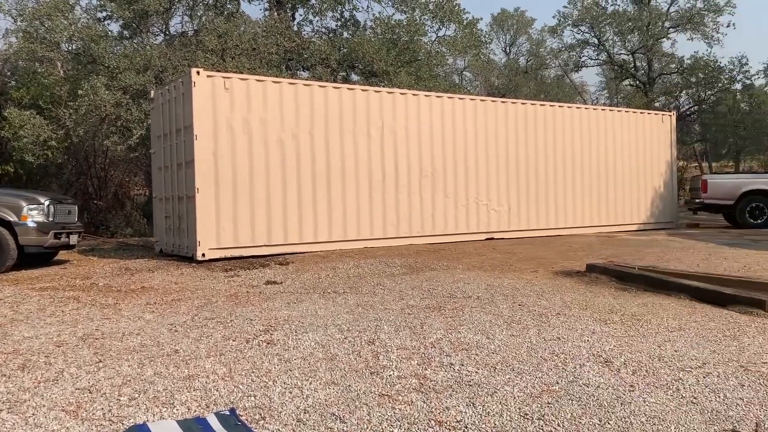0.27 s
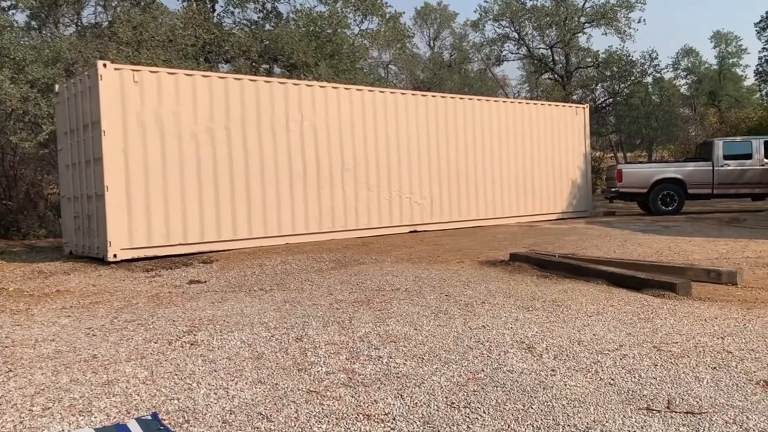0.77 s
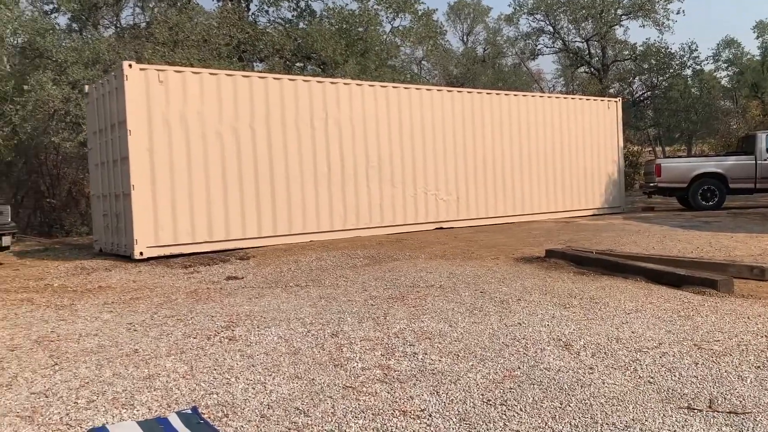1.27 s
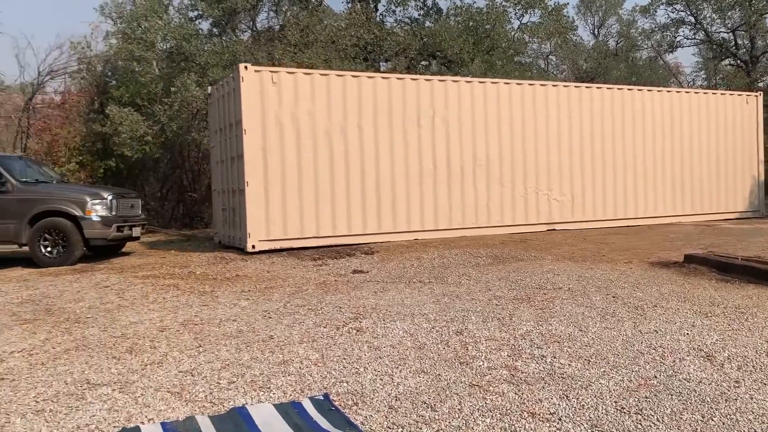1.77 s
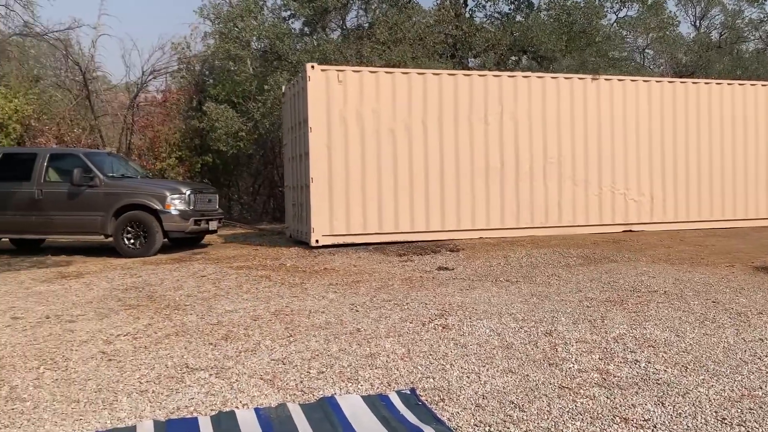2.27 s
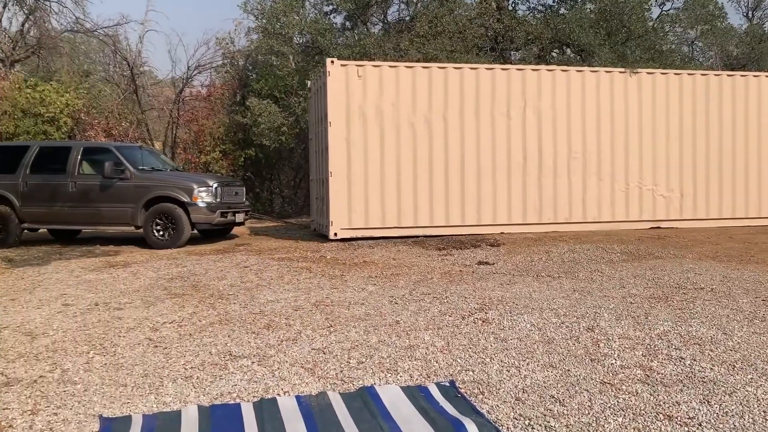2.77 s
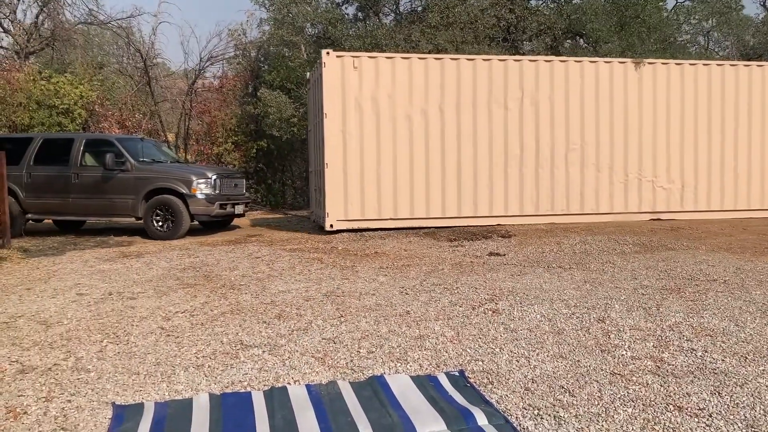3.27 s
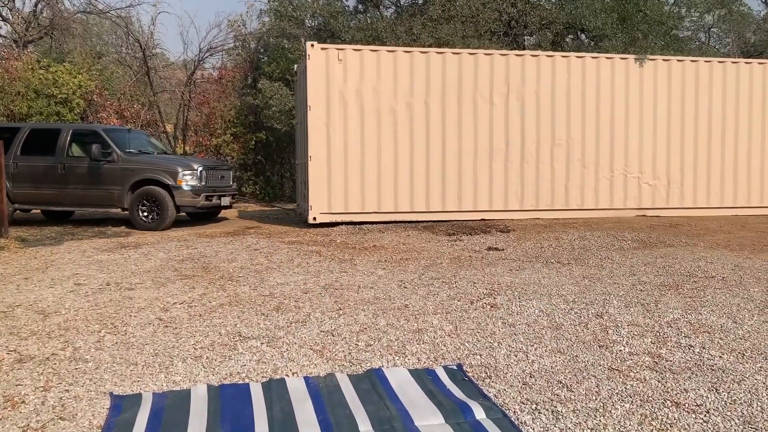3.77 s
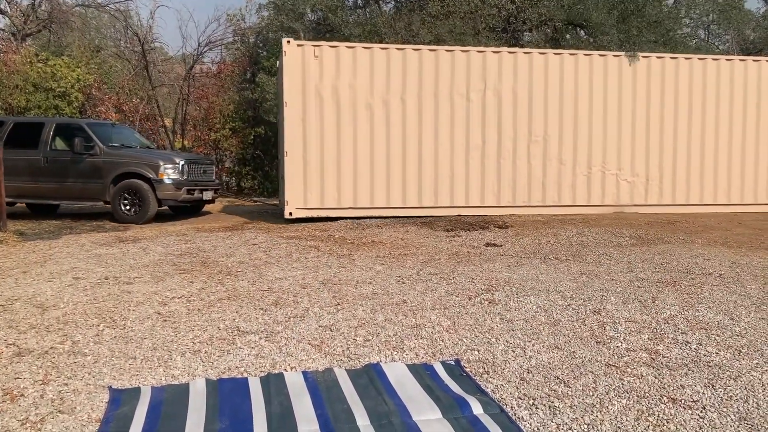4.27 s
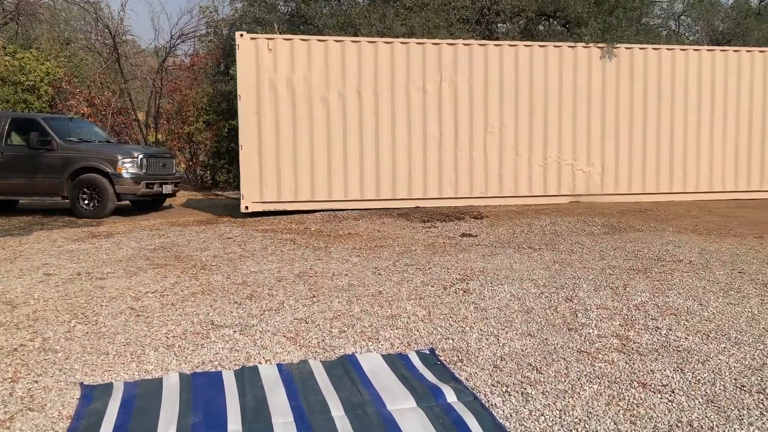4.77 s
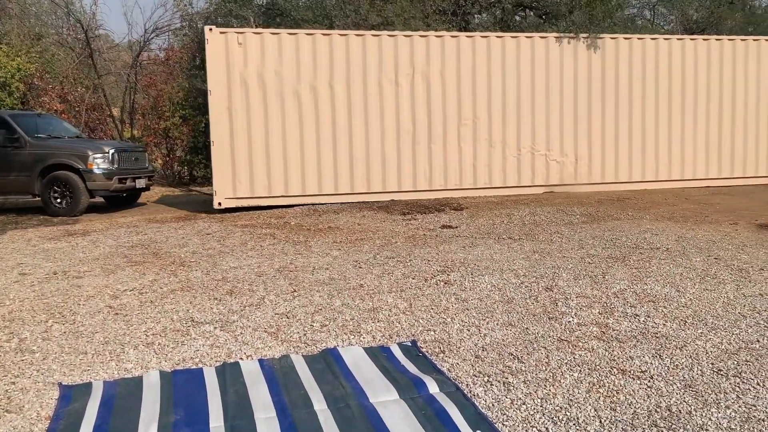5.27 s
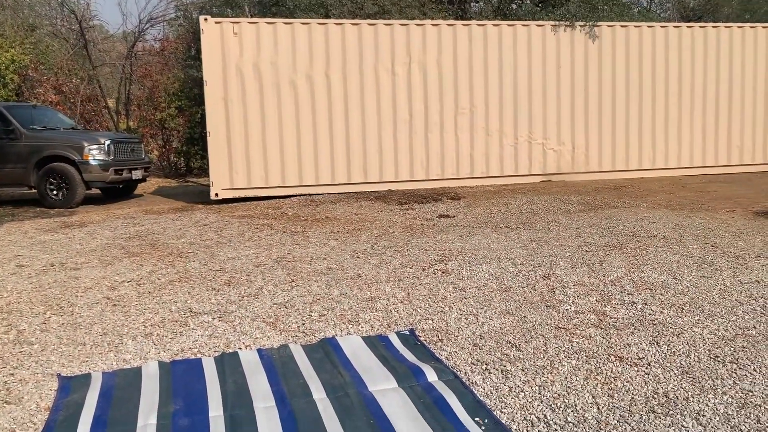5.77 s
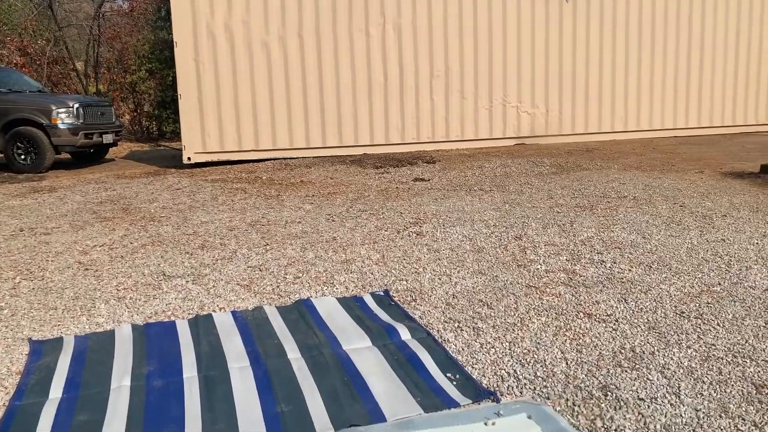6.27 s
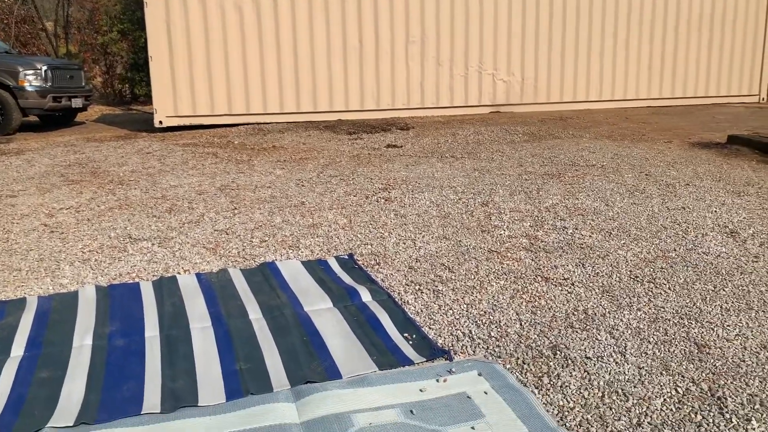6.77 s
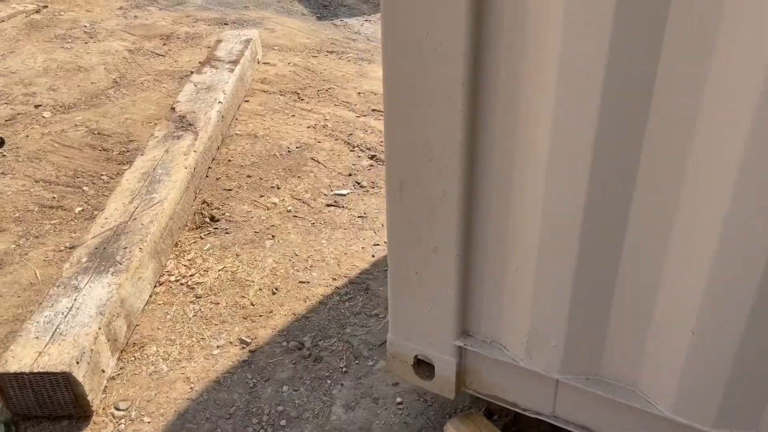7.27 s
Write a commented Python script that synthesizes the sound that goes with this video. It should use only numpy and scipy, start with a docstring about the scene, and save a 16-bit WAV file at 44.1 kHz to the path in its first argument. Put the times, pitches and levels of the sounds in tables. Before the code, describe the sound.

Outdoors on gravel, a diesel engine pulls steadily while a big empty steel container booms, rattles and grinds along. Chain links clink sharply, and sudden lurches bring hollow bangs and groans. The drag dies away past five seconds, leaving a lower idle that revs up. A hard cut leads to a quiet yard with faint breeze, gritty steps and a soft thud. Handheld stereo microphone at moderate distance.

```python
"""A heavy empty steel container booms and grinds over gravel on a chain behind a diesel truck that then
eases off, while a second truck idles and revs; the scene then changes to a quiet yard with a breeze and steps.
Firing pulses and bursts of noise make the engines, sine tones the hum, struck modes the panels and links.
Shaped noise and random knocks make the gravel, the grit and the groan of the floor; slow noise makes the breeze.
The slide and its sudden lurches set the level of every layer of the drag."""
import sys
import numpy as np
from scipy import signal
from scipy.fft import rfft, irfft, next_fast_len
from scipy.io import wavfile
from scipy.ndimage import uniform_filter1d

SR = 44100
rng = np.random.default_rng(int(sys.argv[2]) if len(sys.argv) > 2 else 0)


def put_to_file(sound):
    """Save the sound as 16-bit audio at rate SR, in the file named by the first command-line argument."""
    columns = np.atleast_2d(sound).T  # one column per channel
    safe = np.clip(columns, -1, 1)
    whole_steps = np.round(safe * 32767)
    wavfile.write(sys.argv[1], SR, whole_steps.astype(np.int16))


N = 332066

# lurches as the box breaks loose and surges forward; the envelope in lurches() scales both levels:
# start_s, extra_db, rise_s, decay_s, groan_db
LURCHES = [(.668, 21.5, 0.0081, 0.054, -31), (1.7, 14.5, 0.11, 0.22, -32), (2.94, 5, 0.028, 0.29, -19.5),
           (3.698, 24.5, 0.037, 0.11, -19), (4.07, 2, 0.09, 0.83, -33.5), (4.715, 21.5, 0.05, 0.11, -14.5)]


def gain_of(db):
    """Level law: amplitude grows tenfold for every 20 dB."""
    return 10 ** (np.asarray(db) / 20)


def evened(x):
    """Power normalization: scales a signal to rms 1."""
    return x / np.sqrt(np.mean(x ** 2) + 1e-20)


def columns(rows):
    """Linear interpolation: each column of a curve table at every sample, its first column being time."""
    s, *values = np.transpose(rows)
    return [np.interp(np.arange(N) / SR, s, v) for v in values]


def coloured(x, spectrum):
    """Spectral filtering: weights x by a curve of hz, db, silent beyond its ends, at rms 1."""
    size = next_fast_len(N)
    hz = np.fft.rfftfreq(size, 1 / SR)
    curve_hz, curve_db = np.transpose(spectrum)
    db = np.interp(np.log(hz + 1), np.log(curve_hz + 1), curve_db, -120, -120)
    return evened(irfft(rfft(x, size) * gain_of(db), size)[:N])


def stones(per_s, spread_db):
    """Random impulse train: independent knocks of either sign, a few of them large, at rms 1."""
    size_db = spread_db * np.minimum(rng.exponential(1, N), 5)
    size = gain_of(size_db) * rng.choice([-1., 1.], N)
    return evened(size * (rng.random(N) < per_s / SR))


def lumps(per_s, depth_db):
    """Random amplitude modulation: smoothed noise makes a gain that wanders about per_s times a second."""
    span = max(int(SR / per_s), 2)
    wander = uniform_filter1d(uniform_filter1d(rng.standard_normal(N), span), span)
    return gain_of(depth_db * evened(wander))


def bent(x, per_s, depth_db):
    """Frequency modulation: plays x at a wandering speed, so that its pitches drift."""
    place = np.cumsum(lumps(per_s, depth_db))
    return np.interp(place * N / place[-1], np.arange(N), x)


def ring(modes, seconds):
    """Modal impulse response: exponentially decaying sines, one row for each hz, db, t60_s."""
    t = np.arange(int(seconds * SR)) / SR
    return np.array([gain_of(db - 60 * t / t60) * np.sin(2 * np.pi * (hz * t)) for hz, db, t60 in modes])


def add(mix, s, sound):
    """Superposition: mixes a sound in at s seconds."""
    part = mix[round(s * SR):][:len(sound)]
    part += sound[:len(part)]


def ports(x, table):
    """Interaural-style coherence: direct sound reaches two ports out of phase, scattered sound unalike."""
    f, lead, alike, balance_db = np.transpose(table)
    size = next_fast_len(N + SR // 4)
    hz = np.fft.rfftfreq(size, 1 / SR)
    lead, alike, balance_db = (np.interp(hz, f, c) for c in (lead, np.clip(alike, 0, 1), balance_db))
    # each pitch comes back from the surroundings at its own time, the treble soonest
    delay_s = np.interp(hz, np.arange(0, SR, 30), rng.uniform(0.003, .035, SR // 30)) / (1 + hz / 9000)
    direct = rfft(x, size)
    scattered = direct * np.exp(-2j * np.pi * np.cumsum(delay_s) * hz[1])
    direct_share, scattered_share = np.sqrt((1 + alike) / 2), np.sqrt((1 - alike) / 2)
    tilt = np.exp(.5j * lead) * gain_of(balance_db / 2)
    left = (direct_share * direct + scattered_share * scattered) * tilt
    right = (direct_share * direct - scattered_share * scattered) / tilt
    return irfft(np.array([left, right]), size)[:, :N]


def yard():
    """Turbulence and granular friction: a lumpy breeze on the microphone, grit underfoot, soft thuds."""
    # spectra of the breeze, the crunch and the fine rustle: hz, db
    breeze_spectrum = [(25, -2), (69, -1.5), (106, -14), (239, -24), (390, -33)]
    grit_spectrum = [(150, -35), (250, -20), (1050, -7), (1250, -13), (1970, -12.5), (3500, -26),
                     (4550, -60)]
    rustle_spectrum = [(2060, -40), (3500, -2), (6590, -7.5), (8630, -1), (15800, -3)]
    # steady levels: breeze_db, murmur_db (far yard), leaves_db
    quiet_db = [-48, -63.5, -70.5]
    # feet shifting on grit: start_s, crunch_db, rustle_db, length_s
    steps = [(7.084, -70, -61, 0.033), (7.202, -58, -76, 0.053), (7.325, -64, -65, 0.08),
             (7.397, -58, -57, 0.042), (7.444, -56, -58, 0.059), (7.5, -52, -54, 0.046)]
    # a foot set down on timber and pebbles knocked: start_s, peak_db, pitch_hz, t60_s
    thuds = [(7.213, -50, 480, 0.044), (7.308, -26.5, 70.5, 0.11), (7.388, -48, 1100, .02),
             (7.413, -45, 1050, 0.022), (7.441, -39, 93, 0.12), (7.454, -48, 655, 0.033),
             (7.501, -43, 1000, 0.028)]
    t = np.arange(SR // 5) / SR
    breeze, crunch, rustle = np.ones((3, N)) * gain_of(quiet_db)[:, None]
    for s, crunch_db, rustle_db, length_s in steps:
        press = (2 * t / length_s) ** 2 * np.exp(2 - 4 * t / length_s)  # weight comes on, then off
        add(crunch, s, gain_of(crunch_db) * press)
        add(rustle, s, gain_of(rustle_db) * press)
    out = breeze * coloured(rng.standard_normal(N), breeze_spectrum) * lumps(23.5, 1.6)
    crunching = coloured(rng.standard_normal(N) + 0.7 * stones(800, 2.4), grit_spectrum)
    out += crunch * crunching * lumps(10.5, 1.53)
    out += rustle * coloured(rng.standard_normal(N) + stones(1500, 4.7), rustle_spectrum)
    grit = coloured(rng.standard_normal(N), grit_spectrum)
    for s, db, hz, t60 in thuds:
        knock = ring([(hz, 0, t60)], .2)[0] * (1 - np.exp(-t * hz))  # a soft start, about one cycle long
        fade = np.exp(-t / .006)[:N - round(s * SR)]
        tick = 0.4 * grit[round(s * SR):][:len(t)] * fade * (hz > 200)  # pebbles also click
        add(out, s, gain_of(db) * knock / abs(knock).max())
        add(out, s, gain_of(db) * tick)
    return out


def hum():
    """Amplitude-modulated pure tones: low sines swell, fade and waver in strength."""
    # tones that swell under the engines: pitch_hz, level_db (rms at the swell, before the wavering),
    # loudest_s, span_s
    hum_tones = [(116.6, -19, 3.27, 0.064), (117.8, -18.5, 2.33, 0.18), (118.6, -28, 5.06, 0.96),
                 (175, -35, 6.9, 0.21)]
    t = np.arange(N) / SR
    out = np.zeros(N)
    for hz, db, loudest_s, span_s in hum_tones:
        swell = np.exp(-((t - loudest_s) / span_s) ** 2)
        out += gain_of(db) * swell * lumps(5.6, 1.4) * np.sqrt(2) * np.sin(2 * np.pi * hz * t)
    return out


def engine(rows):
    """Periodic excitation: each firing gives one exhaust pulse and one burst of clatter."""
    # strength of each firing in one cycle: strength_db
    cylinders_db = [-2.5, -7, -1, -7.5, -1, -3.5, -1, -2.5]
    # spectrum of the exhaust pulses: hz, db
    exhaust_spectrum = [(20, -23), (45, 11.5), (110, 6.5), (200, -13), (400, -17), (800, -28.5),
                        (1500, -51)]
    # spectrum of the block and covers under the knock: hz, db
    clatter_spectrum = [(800, -31.5), (1250, 7), (1660, -5), (1960, -1), (2350, -3), (2610, -2.5),
                        (3050, -5.5), (5650, -15.5), (13300, -22), (15800, -32)]
    # thin covers that ring at each knock: resonance_hz
    covers_hz = [1950, 2330, 2570, 2810, 3400]
    cover_width_hz = 60
    firing_hz, tone_db, clatter_db = columns(rows)
    turns = np.cumsum(firing_hz) / SR  # one turn for each firing
    count = turns.astype(int)
    uneven_db = 1.0 * rng.standard_normal(N)[count]
    strength_db = np.array(cylinders_db)[count % len(cylinders_db)] + uneven_db
    pulses = coloured(gain_of(strength_db) * (np.diff(count, prepend=0) > 0), exhaust_spectrum)
    loudness = np.sqrt(uniform_filter1d(pulses ** 2, SR // 5))  # divided out: the tone curve sets the level
    knock = .7 + gain_of(2.2 * strength_db) * np.exp(-(turns % 1) / firing_hz / .005)  # dies in 5 ms
    clatter = coloured(knock * rng.standard_normal(N), clatter_spectrum)
    covers = np.zeros(N)
    for hz in covers_hz:
        resonance = signal.iirpeak(hz, hz / cover_width_hz, SR)
        covers += lumps(6, 4.0) * signal.lfilter(*resonance, knock * clatter)  # each comes and goes
    clatter = evened(clatter + 0.5 * evened(bent(covers, 2.5, .12))) * lumps(24, 0.93)
    return gain_of(tone_db) * pulses / loudness + gain_of(clatter_db) * clatter


def lurches():
    """Stick-slip release: each lurch rises quickly, then dies away exponentially."""
    t = np.arange(N) / SR
    shapes = []
    for s, _, rise_s, decay_s, _ in LURCHES:
        since = np.maximum(t - s, 0)
        shapes.append((1 - np.exp(-since / rise_s)) * np.exp(-since / decay_s))
    return np.array(shapes)


def groan():
    """Friction-driven resonance: at each lurch the steel floor rasps hollowly over the stones."""
    # spectrum of the hollow floor: hz, db
    groan_spectrum = [(480, -36.5), (640, -5), (800, -4), (940, 0.5), (1080, -29)]
    rasp = coloured(rng.standard_normal(N) + 0.21 * stones(400, 1.9), groan_spectrum) * lumps(30, 0.98)
    return gain_of(np.array(LURCHES)[:, 4]) @ lurches() * rasp


def chain():
    """Impact on damped modes: dirty links knock in a gritty cluster, each leaning to its own ring pitch."""
    # the louder links striking: start_s, peak_db, main_hz
    clinks = [(0.3361, -25, 10640), (0.518, -22.5, 9330), (0.5597, -24.5, 6910), (0.668, -17.5, 6740),
              (0.712, -8, 5460), (0.9947, -18.5, 10170), (1.171, -20.5, 10300), (1.339, -26.5, 9410),
              (1.39, -20, 8000), (1.564, -28, 9920), (1.6789, -21.5, 10290), (1.7925, -17.5, 7020),
              (1.817, -16.5, 10000), (2.44, -13.5, 7000), (2.539, -20, 9900), (2.6307, -18.5, 9480),
              (2.75, -19, 4380), (3.01, -21.5, 10100), (3.110, -23, 9440), (3.134, -21.5, 10000),
              (3.166, -20.5, 8340), (3.232, -24, 6800), (3.386, -24, 7490), (3.716, -8.5, 9200),
              (3.744, -6, 9500), (4.254, -21.5, 7680), (4.269, -24, 7400), (4.512, -23, 4700),
              (4.7081, -13.5, 6700), (4.719, -19, 4150), (4.76, -19.5, 9700), (4.9258, -25.5, 9680),
              (5.471, -36, 4150)]
    # modes of the links: hz, db
    link_modes = [(2080, -10), (4250, -10.5), (5350, -9.5), (6790, -8), (7900, -0.5), (9500, 6),
                  (10400, -0.5), (12900, 1), (14000, 2)]
    link_t60_s = .011  # grit on the links damps them at once
    out, t = np.zeros(N), np.arange(3000) / SR
    hz, ring_db = np.transpose(link_modes)
    chance = rng.standard_normal((len(clinks), len(t) + len(link_modes)))
    for (s, db, main_hz), noise in zip(clinks, chance):
        pitch = hz * (1 + .025 * noise[len(t):])  # no two links ring alike
        lean = 0.6 + np.exp(-(np.log(hz / main_hz) / .1) ** 2)
        response = lean @ ring([(f, d, link_t60_s) for f, d in zip(pitch, ring_db)], .03)
        length_s = max(0.012 + 0.00023 * (db + 16), .004)  # harder jerks crunch longer
        hits = noise[:len(t)] * (1 - np.exp(-t / .003))
        hits *= np.exp(-(t / length_s) ** 0.75)
        scrape = signal.lfilter([1, -1], [1, -.75], hits)  # the broad tick of steel on steel
        sound = evened(signal.fftconvolve(hits, response)[:len(t)]) + 0.98 * evened(scrape)
        add(out, s, gain_of(db) * sound / abs(sound).max())
    return out


def drag_levels():
    """Friction-dependent excitation: each layer follows slide and lurches by its share and fades at its rate."""
    # how hard the box slides over the gravel, against a steady pull: time_s, slide_db
    slide = [(0, -4), (.3, -3.5), (.6, -5), (.66, -6.5), (.8, -0.5), (1.5, 0.5), (1.9, 1), (2.45, 2.5),
             (2.88, 0), (3.55, -0.5), (3.95, -2), (4.12, 1), (4.65, -0.5), (4.98, -2), (5.3, -10),
             (5.72, -19.5), (6.3, -17), (7.03, -15)]
    # panel boom, frame rattle, grinding, gravel hiss, one row each:
    # steady_db, slide_share, lurch_share, fastest_fade_db_per_s
    layers = [(-13.5, 0.82, 0.34, 11.5), (-21.5, 1.01, 0.81, 45), (-35.5, 1.56, 1, 90),
              (-41.5, 2.46, 0.71, 120)]
    t, (slide_db,) = np.arange(N) / SR, columns(slide)
    lurch_db = np.array(LURCHES)[:, 1] @ lurches()
    levels = []
    for steady_db, slide_share, lurch_share, fade in layers:
        # the level falls no faster than its fade: the low layers ring on as the slide slows
        held_db = np.maximum.accumulate(slide_share * slide_db + fade * t) - fade * t
        levels.append(steady_db + held_db + lurch_share * lurch_db)
    return levels


def container():
    """Modal excitation: stones under the rails ring the panels and grind; jolts strike the same modes harder."""
    # spectra of the boom, rattle, grinding and hiss: hz, db
    boom_spectrum = [(30, -47), (47, -6.5), (101, 4), (146, -5), (204, -8.5), (260, -15), (340, -48)]
    rattle_spectrum = [(130, -12.5), (220, -2.5), (253, -7), (317, -2.5), (416, -9), (872, -10),
                       (1150, -25), (1500, -27.5)]
    grind_spectrum = [(590, -20), (1100, -6.5), (1670, -4.5), (2180, -10), (3500, -14), (4150, -14.5),
                      (5500, -26), (7150, -46)]
    hiss_spectrum = [(3500, -22), (4500, -4), (7000, -0.5), (9500, 0.5), (13500, -6.5), (15800, -11)]
    # modes of the panels and frame of the empty box: hz, db, t60_s
    panels = [(61.3, -1, 0.58), (117.65, 1.5, 0.3), (165.8, -8, 0.49), (202.5, -6, 0.49), (260, -6, 0.2),
              (308.8, -6, 0.42), (339.8, -6.5, 0.36), (457.8, -12, 0.35), (566, -11.5, 0.11),
              (648, -6.5, 0.098), (785, -12.5, 0.11)]
    # jolts that shake the box: start_s, peak_db (of the ringing), struck_hz (pitch of the part struck)
    jolts = [(.668, -21, 710), (.680, 0, 126), (.709, -0.5, 118), (0.743, -7, 61), (0.975, -5.5, 101.6),
             (1.459, -7.5, 317), (2.249, -4, 117), (2.735, -18.5, 560), (2.97, -22.5, 776),
             (3.014, -7, 850), (3.06, -8, 790), (3.135, -9.5, 314), (3.695, -8.5, 340), (3.729, -9, 336),
             (4.079, -5, 177.6), (4.312, -14, 650), (4.672, -12.5, 650), (4.765, -7.5, 310)]
    boom_db, rattle_db, grind_db, hiss_db = drag_levels()
    modes = ring(panels, .4)
    ringing = evened(sum(signal.oaconvolve(stones(150, 4.47), mode)[:N] for mode in modes))
    ringing = bent(ringing, 4.01, 0.1491)  # the twisting box bends its pitches a little
    low = coloured(ringing, [(25, 0.0093), (240, 0.0031)])
    high = coloured(ringing, [(240, 0.015), (1100, 0.0033)])
    boom = evened(coloured(rng.standard_normal(N), boom_spectrum) + 0.85 * low)
    shaking = coloured(rng.standard_normal(N) + .5 * stones(1500, 6.4), rattle_spectrum)
    rattle = evened(shaking + 0.72 * high)
    crush = 1 + 0.35 * lurches().sum(0)  # a lurch cracks single stones
    grind = coloured(rng.standard_normal(N) + 0.33 * crush * stones(2500, 2.2), grind_spectrum)
    grind *= lumps(57, 1.57)
    hiss = coloured(rng.standard_normal(N) + 0.14 * stones(2200, 1.4), hiss_spectrum) * lumps(55, 1.27)
    shudder = lumps(31, 1.0)  # the whole box judders as it slips and catches
    rough = gain_of(rattle_db) * rattle + gain_of(grind_db) * grind + gain_of(hiss_db) * hiss
    out = gain_of(boom_db) * boom + shudder * rough
    t = np.arange(modes.shape[1]) / SR
    scrape = 0.16 * (rattle + 0.09 * grind)[:len(t)] * np.exp(-t / 0.03)  # the rail skids as it lands
    chance = rng.standard_normal((len(jolts), len(panels)))
    panel_hz = np.array(panels)[:, 0]
    for (s, db, struck_hz), weights in zip(jolts, chance):
        near = 0.15 + np.exp(-(np.log(panel_hz / struck_hz) / 0.17) ** 2)  # the struck part rings most
        blow = (near * gain_of(2.8 * weights)) @ modes
        blow *= (1 - np.exp(-t / 0.0018)) * np.exp(-t / 0.094)  # the ground damps it
        add(out, s, gain_of(db) * (blow / abs(blow).max() + scrape))
    return out


def scene():
    """Superposition of independent sources: the haul, then the yard."""
    # engine curves: time_s, firing_hz, exhaust_db, clatter_db
    pulling = [(0, 99.86, -16.5, -33.5), (.6, 101.7, -29, -34), (1.6, 98.16, -31, -34.5),
               (2.5, 94.1, -25, -38), (3.6, 96.84, -19, -40), (4.8, 97.6, -22, -57), (5.4, 98.7, -29, -52),
               (7.03, 98.75, -58, -50)]
    waiting = [(5.6, 47.4, -25, -46), (6.2, 48.7, -30.5, -48), (6.45, 62.3, -31, -44),
               (6.7, 75.4, -38, -44.5), (6.85, 81.43, -23, -42), (7.03, 82.36, -27, -42.5)]
    # two microphone ports, one table a direction: hz, left_lead_rad, likeness (0-1), left_minus_right_db
    from_engine = [(0, 0, 1, -1.4), (250, 0, .99, -.5), (600, .3, .8, 1), (1200, 2, .85, 0),
                   (2070, 4.6, .9, -1), (4200, 11, .35, -2), (6400, 19.4, .5, -3), (7400, 18.1, .45, 0),
                   (8700, 15.7, .97, 0), (15100, 3.14, .98, 0)]
    from_box = [(0, 0, .99, -1.9), (200, 0, .985, -.3), (1000, -.5, .8, -1.2), (1500, .2, .6, 0),
                (2200, 0, .1, 1.2), (2930, 2.2, .2, 1), (4200, 6.3, .45, -2), (6400, 13.2, .45, -3),
                (7400, 11.8, .45, 0), (8700, 9.42, .93, 0), (15100, -3.14, .96, 0)]
    from_yard = [(0, 0, .95, 0), (600, .1, .5, 1), (2100, .5, .8, -2), (4200, 2, .3, 5), (6400, 0, .9, 0),
                 (8400, -3.14, .98, 0), (13500, -6.28, .98, -.8)]
    change_s, crossfade_s = 7.034, 0.0021
    haul = ports(engine(pulling) + engine(waiting) + hum(), from_engine)
    haul += ports(container() + groan() + chain(), from_box)
    after = np.clip((np.arange(N) / SR - change_s) / crossfade_s, 0, 1)
    return haul * (1 - after) + ports(yard(), from_yard) * after


def record(dry):
    """Band limiting and soft saturation: deepest bass drops, high peaks round off, top treble is cut."""
    ceiling, low_hz, edge_hz = .95, 32, 15800
    thin = signal.sosfilt(signal.butter(2, low_hz, "high", fs=SR, output="sos"), dry)
    soft = ceiling * np.tanh(thin / ceiling)
    lowpass = signal.firwin(1023, edge_hz, window=("kaiser", 9), fs=SR)
    return signal.oaconvolve(soft, lowpass[None], "same")


dry = scene()
out = record(dry)
put_to_file(out)
```